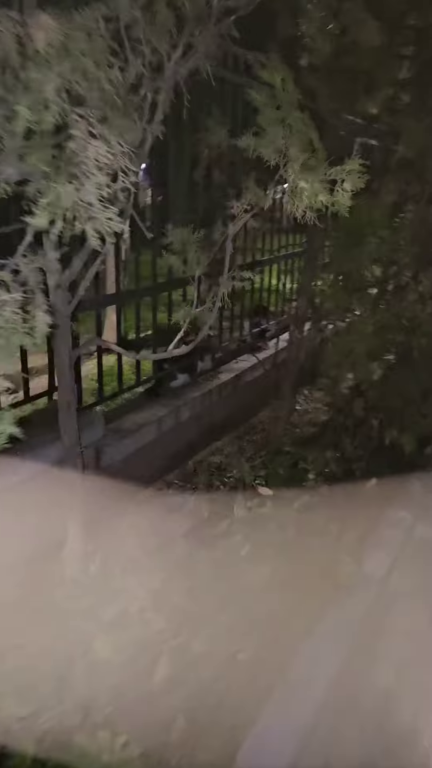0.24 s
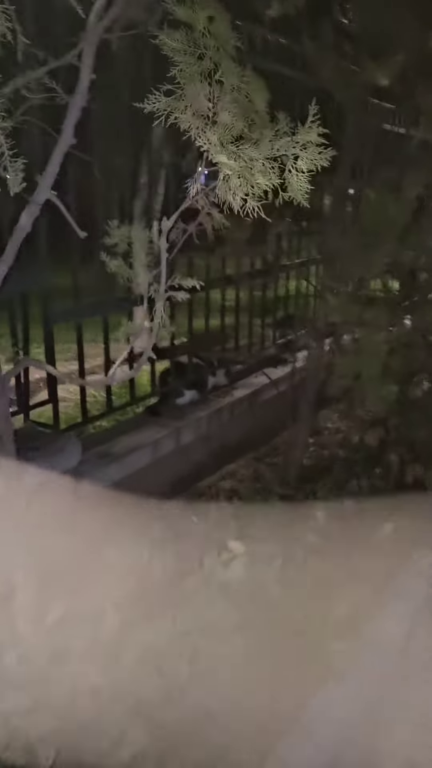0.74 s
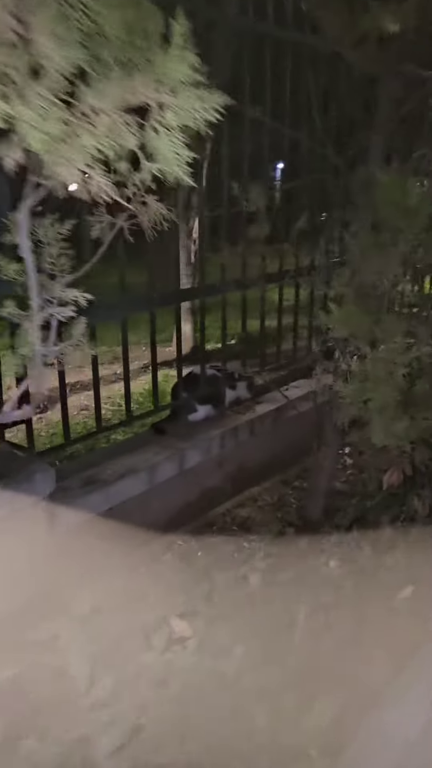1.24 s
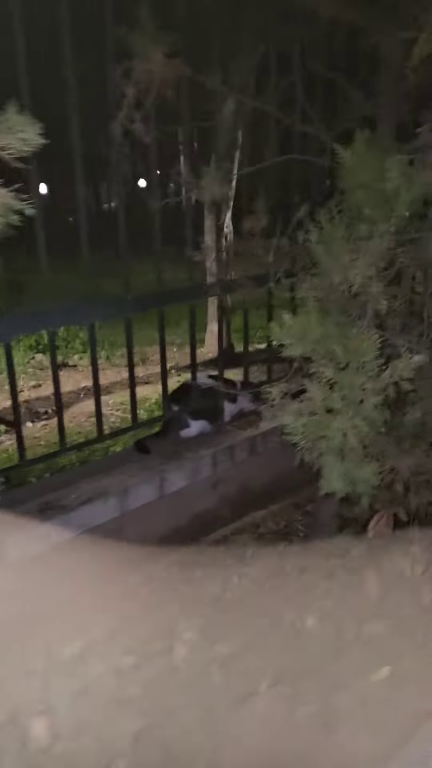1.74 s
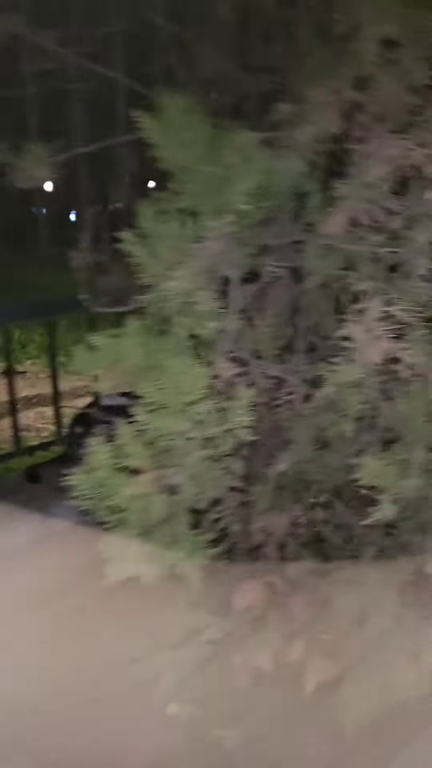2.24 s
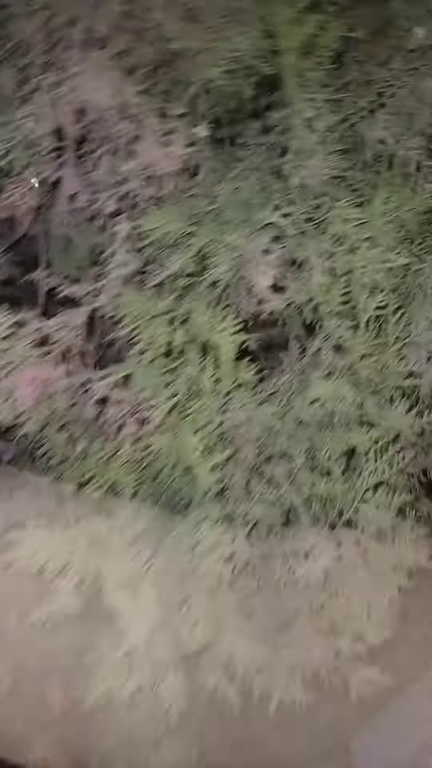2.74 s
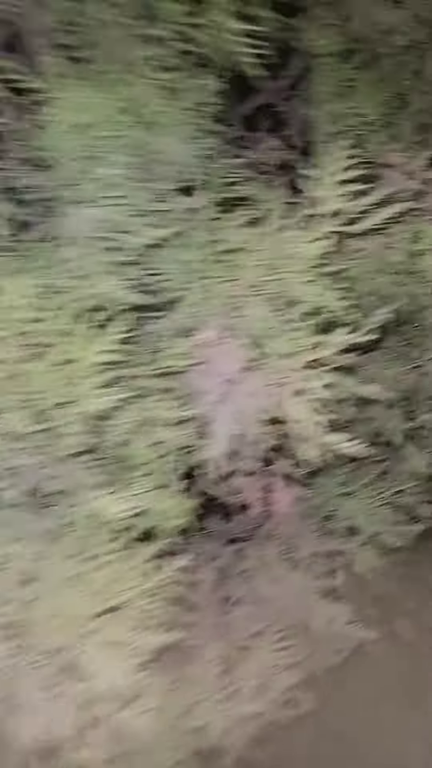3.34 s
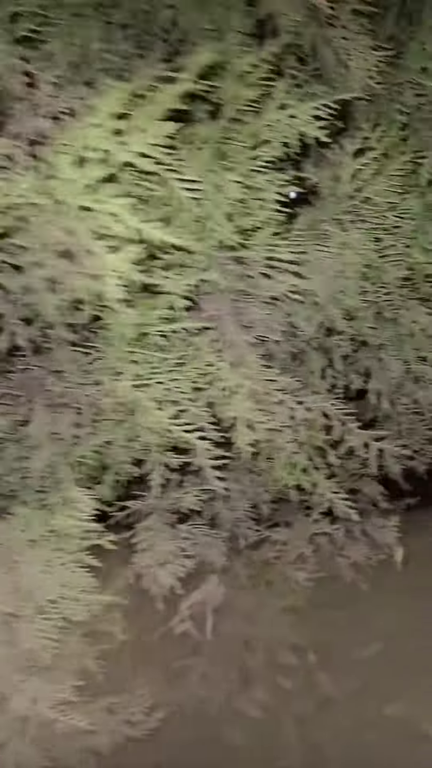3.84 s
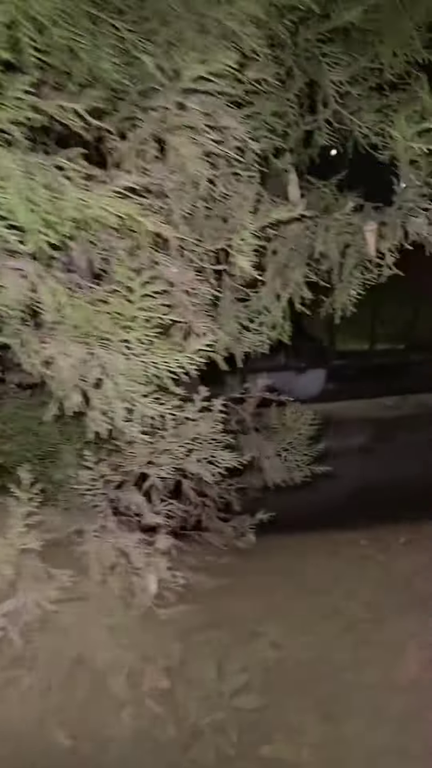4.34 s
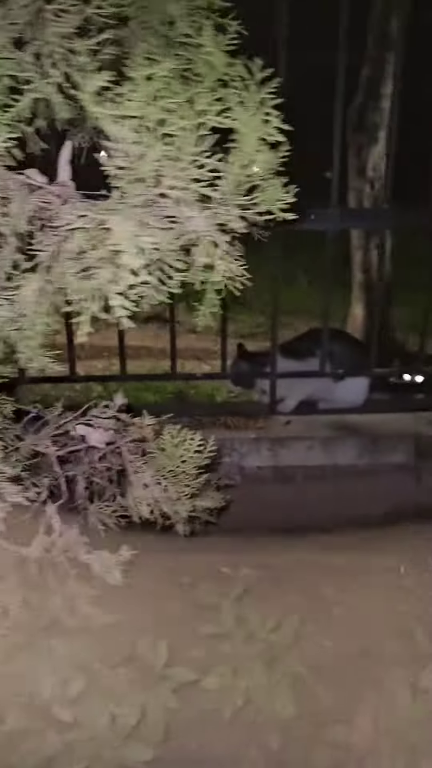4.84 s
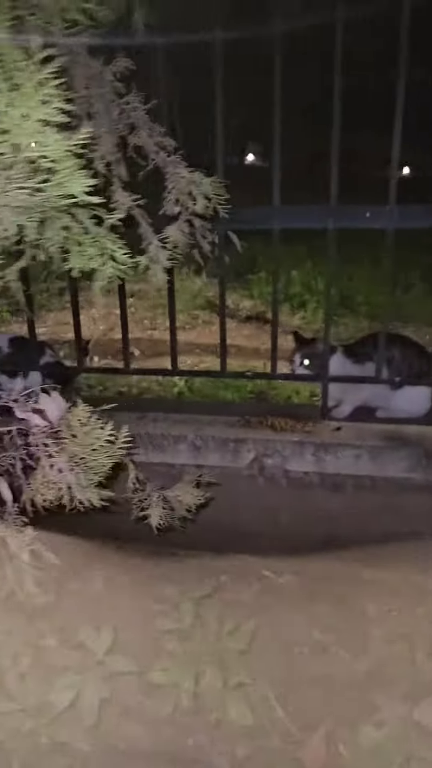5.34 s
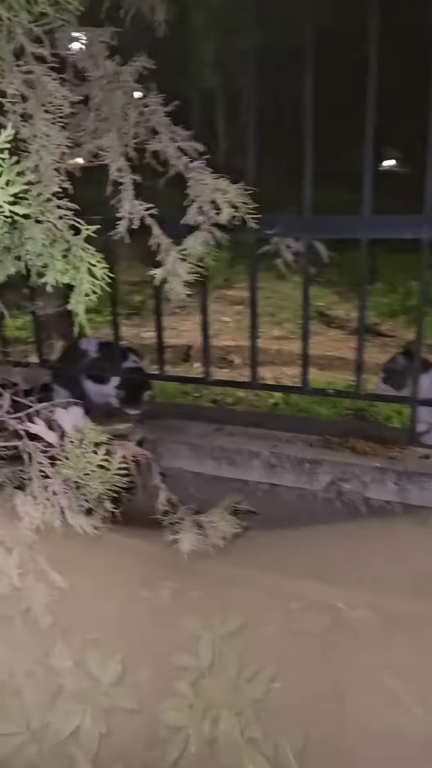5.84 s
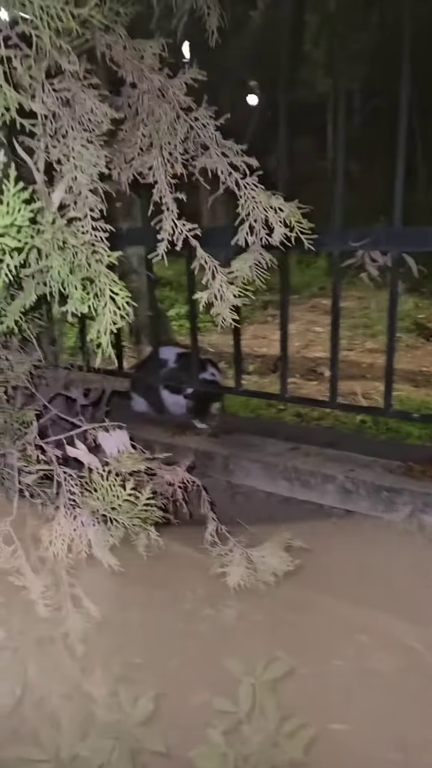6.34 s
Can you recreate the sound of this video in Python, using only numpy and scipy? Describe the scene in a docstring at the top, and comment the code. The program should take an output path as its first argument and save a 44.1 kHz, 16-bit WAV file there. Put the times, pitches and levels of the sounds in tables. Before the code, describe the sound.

Outdoors at night on the edge of a park, a deep steady rumble of distant traffic with a soft wash of tyres rises and falls as vehicles pass far away. A faint machine hums behind. Around the middle, a hand-held microphone moving along bushes picks up a few dry clicks, a dull knock and short leafy brushes, then mostly traffic remains, with another small click near five seconds.

```python
"""Edge of a park at night: distant city traffic, a deep rumble and a wash of tyres, swells as four vehicles pass.
The traffic is shaped noise in two loosely alike ports, with wavering tones for engine notes.
The hand-held microphone moves along the bushes: filtered pulses click and short noise swells brush close by.
Some machine, perhaps a cooling compressor, hums in harmonics and rattles in resonant noise faintly behind.
Fingers on the casing add a very faint fizz."""
import sys
import numpy as np
from scipy import signal
from scipy.fft import rfft, irfft
from scipy.io import wavfile
from scipy.ndimage import uniform_filter1d

SR = 44100
rng = np.random.default_rng(int(sys.argv[2]) if len(sys.argv) > 2 else 0)


def waveform_to_disk(signal):
    """Save audio, clipped to [-1, 1], as 16-bit WAV at the path in sys.argv[1]."""
    frames = np.transpose(np.atleast_2d(signal))
    scaled = np.clip(frames, -1, 1) * 32767
    samples = np.round(scaled).astype(np.int16)
    wavfile.write(sys.argv[1], SR, samples)


N = 290029
TIME, BINS = np.arange(N) / SR, np.fft.rfftfreq(N, 1 / SR)  # seconds, Hz

# Levels of the steady stream of far vehicles and of the town's hiss (dB rms)
STREAM_RUMBLE_DB, STREAM_DRONE_DB, STREAM_TYRES_DB, STREAM_HISS_DB = -37.5, -49, -52, -69
# Time from a vehicle's nearest point to half power (s)
RUMBLE_PASS_S, ENGINE_PASS_S, TYRE_PASS_S = 0.68, 0.34, 0.62
# How layers follow the far treble (dB per dB; for the tilt, dB per octave per dB)
TYRES_FOLLOW, HISS_FOLLOW, TILT_FOLLOW = 0.26, 0.74, 0.17
TYRES_TILT_DB = 0.45  # mean brightness of the tyres (dB per octave)
FLUTTER_DB = 1.3  # rms flutter of the engine notes and of the machine's high tones

# Colours of the far traffic and the town's hiss. Each row: frequency in Hz, relative level in dB per Hz.
RUMBLE_COLOUR = [(8, -26), (15, -25), (23, -17), (38, -2), (58, 4), (72, -2), (97, 0), (121, 2.5),
                 (150, -3), (175, -11.5), (300, -33.5), (2000, -100)]
DRONE_COLOUR = [(50, -38.5), (140, -4.5), (190, 4), (280, 1), (350, -1), (420, -15), (600, -41),
                (3000, -94)]
TYRE_COLOUR = [(150, -20.5), (300, 0.5), (430, 0), (500, -2), (700, -1), (950, -5.5), (1500, -9),
               (2400, -18.5), (3500, -26.5), (4100, -30), (6000, -55.5), (16000, -84)]
HISS_COLOUR = [(200, -20), (3300, 4.5), (4000, -2.5), (4700, -0.5), (5200, -3.5), (5900, -8), (6800, -5),
               (8600, -6), (9500, -17.5), (10500, -12.5), (11400, -32), (12600, -15.5), (15700, -23)]
# Vehicles that stand out of the stream.
# Each row: time when nearest in seconds, then levels of rumble, drone and tyres in dB rms.
VEHICLE_PASSES = [(0.703, -41.5, -49, -55.5), (2.399, -45, -47, -74), (4.45, -61, -49, -70),
                  (6.148, -39.5, -45.5, -54.5)]
# Engine notes that come and go.
# Each row: time when loudest in seconds, level in dB rms, pitch in Hz, swell in seconds, rms wavering in Hz.
ENGINE_NOTES = [(.75, -54, 317, 0.34, 3), (.9, -63, 587, 0.49, 1.5), (1.85, -43, 57.84, .25, 3),
                (2.0, -62, 587, 0.22, 1.5), (2.3, -51, 290.7, 0.15, 8), (4.6, -51.5, 242.5, .6, 1.5),
                (5.45, -45, 119.7, 0.34, 4), (5.95, -65.5, 775, 0.46, 1.44), (6.0, -54.5, 243, .3, 1.9),
                (6.35, -55, 322, 0.2, 7)]


def traffic():
    """Engines merge into rumble and drone under tyres and the town's hiss; passing vehicles swell all but the hiss."""
    treble_db = exposure()
    when, rumble_db, drone_db, tyre_db = np.transpose(VEHICLE_PASSES)

    rumble = street_noise(RUMBLE_COLOUR, patchy_db=0.54)
    rumble = rumble * flow(STREAM_RUMBLE_DB, when, rumble_db, RUMBLE_PASS_S)

    drone = street_noise(DRONE_COLOUR, patchy_db=0.3)
    drone = drone * flow(STREAM_DRONE_DB, when, drone_db, ENGINE_PASS_S)

    tyre_tilt_db = TYRES_TILT_DB + TILT_FOLLOW * treble_db
    tyres = street_noise(TYRE_COLOUR, patchy_db=1.0, tilt_db=tyre_tilt_db)
    tyres = tyres * flow(STREAM_TYRES_DB, when, tyre_db, TYRE_PASS_S)
    tyres = tyres * amp(TYRES_FOLLOW * treble_db)

    hiss = street_noise(HISS_COLOUR, patchy_db=2.0)
    hiss = hiss * amp(STREAM_HISS_DB + HISS_FOLLOW * treble_db)

    notes = sum(engine_note(*row) for row in ENGINE_NOTES)
    return rumble + drone + tyres + hiss + notes


def engine_note(s, db, hz, swell_s, width_hz, waver_hz=6.01, doppler=0.004):
    """An engine's note swells out of the drone and fades, wavering and sinking a little as the vehicle goes by."""
    way = (TIME - s) / swell_s
    pitch = hz * (1 - doppler * np.tanh(way)) + width_hz * drift(waver_hz)
    gain = amp(db + FLUTTER_DB * drift(waver_hz)) / np.hypot(1, way ** 2)
    return np.sqrt(2) * gain * np.cos(2 * np.pi * np.cumsum(pitch) / SR)


def flow(stream_db, times, levels_db, pass_s):
    """Gain of a steady stream and the passing vehicles, added in power."""
    power = amp(stream_db) ** 2
    for s, db in zip(times, levels_db):
        power = power + (amp(db) * nearness(s, pass_s)) ** 2
    return np.sqrt(power)


def nearness(s, pass_s):
    """Gain of a vehicle on a straight road: one over its distance, 1 when nearest."""
    return 1 / np.hypot(1, (TIME - s) / pass_s)


# Far treble as the microphone is moved along the bushes; only its departure from the mean is heard.
# Each row: time in seconds, level in dB.
TREBLE_CURVE = [(0.0, -61), (2.27, -58.5), (2.8, -59), (3.5, -63.5), (6.05, -67), (6.58, -65.5)]


def exposure():
    """How open the microphone is to the far treble (dB about its mean)."""
    level_db = at_time(TREBLE_CURVE, TIME)
    return level_db - level_db.mean()


# Likeness of the microphone's two ports. Each row: frequency in Hz, correlation.
PORT_LIKENESS = [(30, .98), (170, .98), (350, .9), (700, .55), (1250, -.05), (2500, .2), (5000, .03),
                 (15000, 0)]
# Balance of the two ports. Each row: frequency in Hz, left minus right in dB.
PORT_BALANCE = [(50, 0), (400, 0.5), (800, -.6), (1400, 0.7), (4500, 0.5), (6500, 5), (8500, 0), (10500, 6),
                (12000, 5), (15000, -3)]


def street_noise(spectrum, patchy_db, tilt_db=0):
    """Diffuse noise at two close ports, alike mostly in the bass, with drifting patches and a tilt per octave."""
    hz, t, z = signal.stft(rng.standard_normal((2, N)), SR, nperseg=1024, noverlap=768)
    patches = rng.standard_normal(z.shape[1:])
    patches = uniform_filter1d(patches, size=10, axis=0)  # smooth over frequency
    patches = unit(uniform_filter1d(patches, size=22, axis=1))  # and over time
    octaves = np.log2(np.clip(hz, 400, 5000) / 800)[:, None]
    tilt = octaves * np.interp(t, TIME, tilt_db * np.ones(N))
    z = z * amp(patchy_db * patches + tilt)
    a, b = rfft(signal.istft(z, SR, nperseg=1024, noverlap=768)[1][:, :N])

    same = np.clip(at_freq(PORT_LIKENESS, BINS), -1, 1)
    mid, side = a * np.sqrt(1 + same), b * np.sqrt(1 - same)
    lean = amp(at_freq(PORT_BALANCE, BINS) / 2)
    ports = np.array([(mid + side) * lean, (mid - side) / lean])
    pair = irfft(ports * amp(at_freq(spectrum, BINS)), N)
    return pair / np.sqrt(np.mean(pair.mean(0) ** 2))  # the mean of the ports has rms 1


# Small clicks and knocks, close by, of twigs and of the casing under the fingers.
# Each row: start in seconds, peak in dB, low and high band edges in Hz, slopes below and above the band
# in dB per octave, left minus right in dB, lag of the left port in ms.
CLICK_EVENTS = [(1.8738, -45, 11500, 13000, -18, -13, -10, 0.018),
                (1.8805, -52, 9000, 11500, -20, -20, -5, 0.024),
                (2.3928, -26, 3400, 6850, -42, -25, -23, 0.063),
                (2.5837, -23.5, 190, 607, -13, -36, -17, 0.059), (2.5692, -45, 2800, 5000, -16, -18, -9, 0),
                (2.5990, -40, 1200, 5000, -15, -24, 4, 0), (2.9423, -38.5, 1760, 2500, -16, -13, 0, 0),
                (2.9430, -48.5, 10800, 12800, -40, -85, -10, 0.033),
                (3.1440, -39, 376, 600, -15, -24, -2, 0.2), (3.1443, -18.5, 960, 1420, -9, -21, -2.5, 0.41),
                (3.1448, -46, 4400, 4950, -52, -60, -1, 0.46),
                (3.1450, -54, 12000, 14000, -32, -50, -12, 0.057), (4.429, -36, 400, 900, -21, -21, -15, 0),
                (4.456, -46, 4500, 10000, -18, -18, -16, 0.019),
                (5.0282, -50.5, 4180, 4550, -90, -90, -6, 0.044),
                (5.0285, -56, 10500, 14000, -40, -30, -10, 0.03),
                (5.0306, -49, 4150, 4550, -90, -85, -5, 0.098),
                (5.1096, -26.5, 450, 4000, -10, -28, -26, 0.042)]


def clicks(tilt_db=-6.5):
    """Each click is one short push in its own band, tilted per octave; steep skirts make it ring briefly."""
    out, size = np.zeros((2, N)), 2048
    hz = abs(np.fft.fftfreq(size, 1 / SR)) + 1
    for s, db, low_hz, high_hz, below_db, above_db, side_db, lag_ms in CLICK_EVENTS:
        inside = np.clip(hz, low_hz, high_hz)
        skirt_db = np.where(hz < low_hz, below_db, above_db) * abs(np.log2(hz / inside))
        colour_db = tilt_db * np.log2(inside / low_hz) + skirt_db
        log_gain = np.log(amp(np.maximum(colour_db, -80)))
        # minimum phase: sharp front, short tail
        pulse = np.fft.ifft(np.exp(np.conj(signal.hilbert(log_gain)))).real
        pulse = pulse / abs(pulse).max()
        starts = round(s * SR) + np.array([round(lag_ms * SR / 1000), 0])
        for port, start, gain in zip(out, starts, panned(side_db)):
            port[start:start + size] += amp(db) * gain * pulse
    return out


def scattered(x, wet_db=-17, t60=0.062):
    """Ground, wall and foliage add a faint, short tail."""
    t = np.arange(SR // 5) / SR
    tail = rng.standard_normal((2, len(t))) * amp(-60 * t / t60)
    tail /= np.linalg.norm(tail, axis=1, keepdims=True)
    return x + amp(wet_db) * signal.fftconvolve(x.mean(0)[None], tail, axes=1)[:, :N]


# Sprigs or cloth brushing past, close to the microphone.
# Each row: time when strongest in seconds, level in dB rms, rise and fall in seconds, left minus right in dB.
BRUSH_EVENTS = [(1.880, -60, .004, .02, -12), (2.567, -52, 0.013, .018, -10), (2.600, -53, .002, 0.0062, 6),
                (2.945, -58, .005, .008, 1), (3.19, -62.5, 0.047, 0.11, -1),
                (3.799, -51, 0.008, 0.025, -14), (4.436, -52.5, .004, 0.011, -16)]
# Colour of the brushing. Each row: frequency in Hz, relative level in dB per Hz.
BRUSH_SPECTRUM = [(200, -35), (600, 16), (2200, 14.5), (3500, 15.5), (6000, 6), (8000, 6.5), (10000, -4),
                  (12500, -3), (15500, -7)]


def brushes(slip_spread_db=3.5):
    """Dense, tiny slips that catch quickly and trail off."""
    slips = rng.standard_normal((2, N)) * amp(slip_spread_db * drift(1200))
    grit = coloured(slips, BRUSH_SPECTRUM)
    gain = np.zeros((2, N))
    for s, db, rise_s, fall_s, side_db in BRUSH_EVENTS:
        gain += amp(db) * panned(side_db) * swell(s, rise_s, fall_s)
    return grit * gain


CYCLE_HZ = 24.47  # the machine's cycle
# Tones of the faint machine, before their slow changes. Each row: multiple of its cycle, level in dB rms.
HUM_TONES = [(5, -50), (10, -60), (22, -70), (24, -71), (32, -75), (43, -77), (64, -80), (77, -79),
             (114, -87.5), (124, -90), (134, -88), (135, -89), (136, -89), (137, -81), (220, -94),
             (221, -96), (302, -95), (443, -104)]
# Gain of its high tones; lower tones and the rattle follow in part. Each row: time in seconds, gain in dB.
WHINE_CURVE = [(0, 1), (.7, 2), (1.3, 6.5), (2.1, 10), (2.9, 7), (3.3, -4), (4.3, -3.5), (6.58, -6.5)]
# Knocks within one cycle. Each row: share of the cycle, relative level in dB.
CYCLE_KNOCKS = [(0.123, -4.5), (0.472, -4.5), (0.621, -2), (0.869, -6.5)]
# Resonances of the loose panel, before balance and slow changes.
# Each row: frequency in Hz, width in Hz, level in dB rms.
PANEL_RINGS = [(3340, 90, -79), (5370, 170, -78.5), (7410, 90, -80.5)]


def machine(waver_db=0.5, speed_wander=0.00067, knock_length=0.19):
    """A hum whose high tones flutter, and a loose panel that rattles a few times in every cycle."""
    turns = np.cumsum(CYCLE_HZ * (1 + speed_wander * drift(1.67))) / SR
    whine_db = at_time(WHINE_CURVE, TIME)
    hum = np.zeros((2, N))
    for order, db in HUM_TONES:
        # high tones are shaded by the hand and reach the ports out of step
        treble = min(order / 120, 1)
        arrival = np.array([[.5], [-.5]]) * treble * drift(1.0)
        tone = np.sqrt(2) * np.cos(2 * np.pi * (round(order) * turns + rng.random()) + arrival)
        shading_db = treble * (whine_db + FLUTTER_DB * drift(7))
        hum += amp(db + shading_db + waver_db * drift(0.76)) * tone

    # each knock decays to 1/e in knock_length of a cycle
    blows = sum(amp(db) * np.exp(-((turns - share) % 1) / knock_length) for share, db in CYCLE_KNOCKS)
    chatter = rfft(blows * rng.standard_normal((2, N)))
    rattle = np.zeros((2, N))
    for hz, width, db in PANEL_RINGS:
        resonance = 1 / (1 + 1j * (BINS - hz) / width) ** 2
        rattle += amp(db) * unit(irfft(chatter * resonance, N))
    return hum + rattle * panned(2.0) * amp(0.32 * whine_db)


# Rubs of the fingers on the microphone's casing. Each row: time when strongest in seconds, level in dB rms.
FINGER_RUBS = [(.17, -78), (.65, -77), (1.39, -82), (1.9, -81), (2.56, -75), (3.2, -78), (3.83, -74),
               (4.39, -80)]
# Colour of the faint rubbing. Each row: frequency in Hz, relative level in dB per Hz.
FIZZ_COLOUR = [(500, -42), (6000, -18), (9500, -19), (11000, -2), (12800, -5.5), (14500, -7.5),
               (15700, -14.5)]


def grip(level_db=-85, settle_db=8, unrest_db=2, grain_db=3):
    """Fingers shift on the casing: a faint, restless fizz that swells with each rub and settles with the hand."""
    slips = rng.standard_normal((2, N)) * amp(unrest_db * drift(3.4) + grain_db * drift(500))
    resting = amp(level_db - settle_db * (TIME / TIME[-1]) ** 2)
    rubbing = sum(amp(db) * swell(s, rise_s=0.074, fall_s=0.041) for s, db in FINGER_RUBS)
    return np.hypot(resting, rubbing) * panned(-22.0) * coloured(slips, FIZZ_COLOUR)


def swell(s, rise_s, fall_s):
    """Gain that climbs to 1 at s and dies away after it."""
    return np.exp(-np.maximum((s - TIME) / rise_s, (TIME - s) / fall_s))


def coloured(x, spectrum):
    """Filters noise to a spectrum and scales it to rms 1."""
    return unit(irfft(rfft(x) * amp(at_freq(spectrum, BINS)), N))


def drift(rate_hz):
    """Random wandering of rms 1, low-passed with a Gaussian curve."""
    return unit(irfft(rfft(rng.standard_normal(N)) * np.exp(-(BINS / rate_hz) ** 2), N))


def panned(side_db):
    """Left and right gains whose mean is 1, from left minus right in dB."""
    pair = amp(np.array([[side_db], [-side_db]]) / 2)
    return pair / pair.mean()


def amp(db):
    """Decibels to gain."""
    return 10 ** (np.asarray(db) / 20)


def unit(x):
    """Scales to rms 1."""
    return x / np.sqrt(np.mean(x ** 2) + 1e-20)


def at_freq(points, hz):
    """Reads a spectrum on a log-frequency axis."""
    f, value = np.transpose(points)
    return np.interp(np.log(hz + 1), np.log(f + 1), value)


def at_time(points, t):
    """Reads a curve over time."""
    return np.interp(t, *np.transpose(points))


def scene():
    """The far town and its traffic, the near handling sounds and the faint machine."""
    return traffic() + scattered(clicks()) + brushes() + machine() + grip()


def record(dry):
    """The recorder's band limit: a steep low-pass at 15760 Hz."""
    lowpass = signal.firwin(1023, 15760, window=("kaiser", 9), fs=SR)
    return signal.oaconvolve(dry, lowpass[None], "same")


dry = scene()
out = record(dry)
waveform_to_disk(out)
```